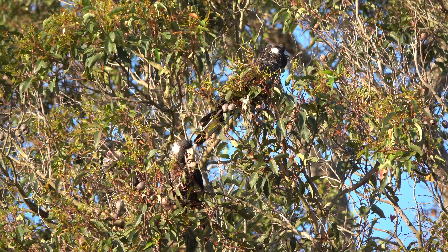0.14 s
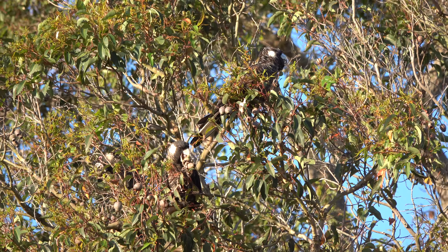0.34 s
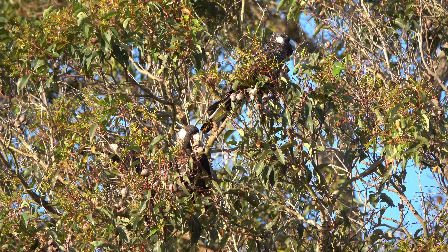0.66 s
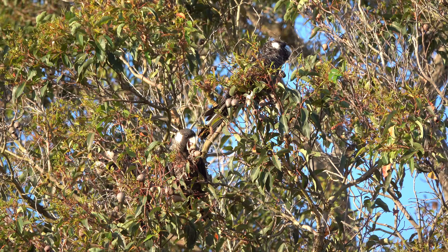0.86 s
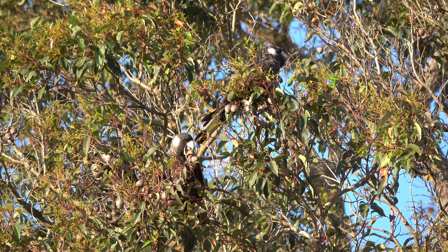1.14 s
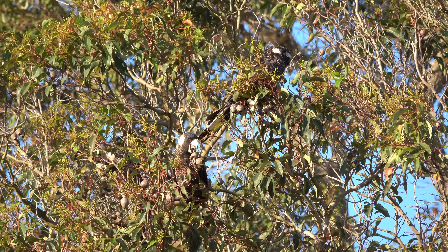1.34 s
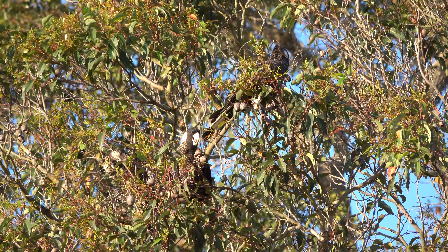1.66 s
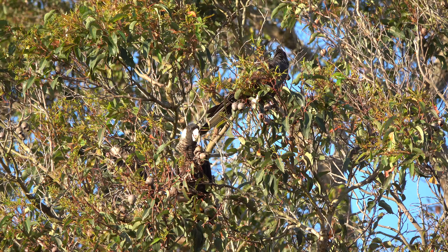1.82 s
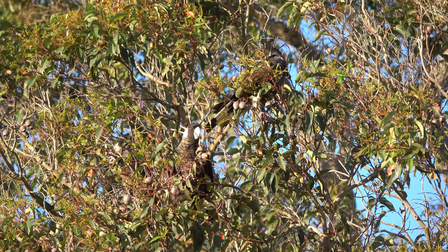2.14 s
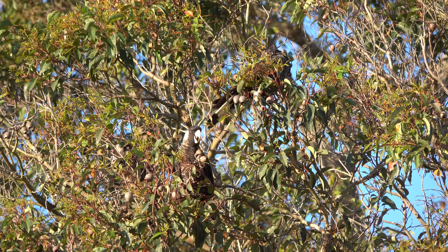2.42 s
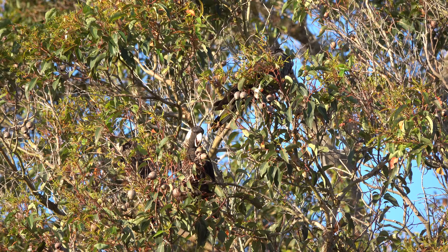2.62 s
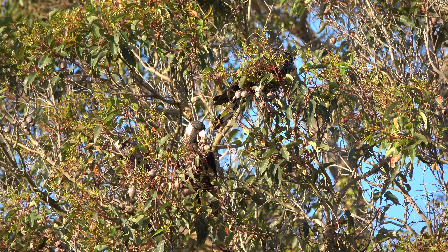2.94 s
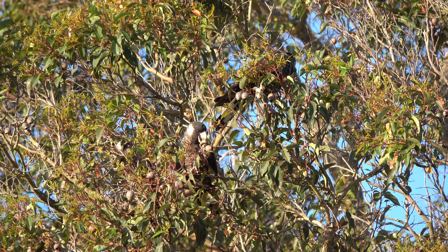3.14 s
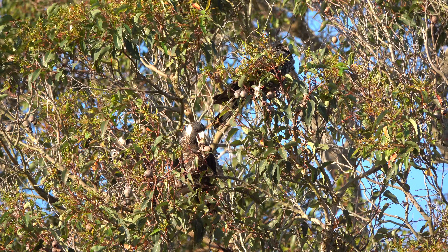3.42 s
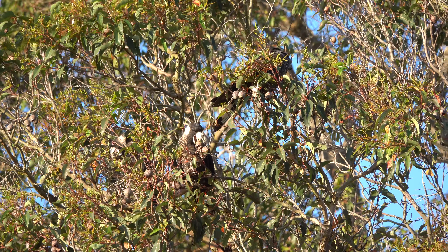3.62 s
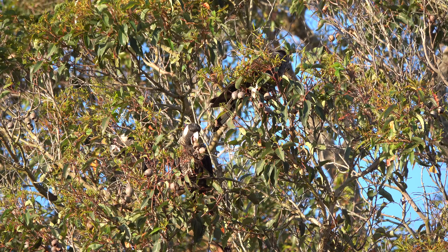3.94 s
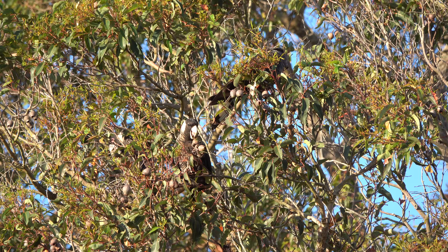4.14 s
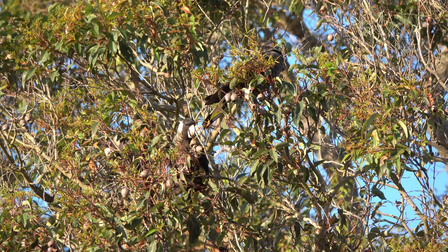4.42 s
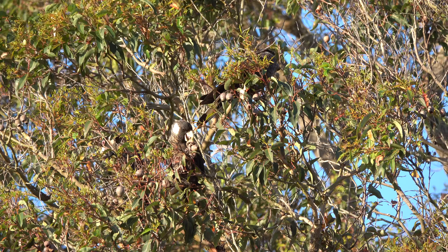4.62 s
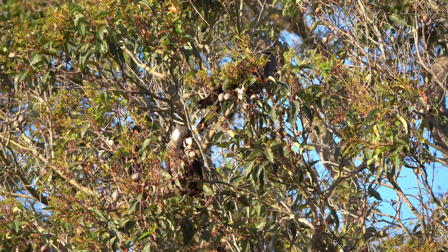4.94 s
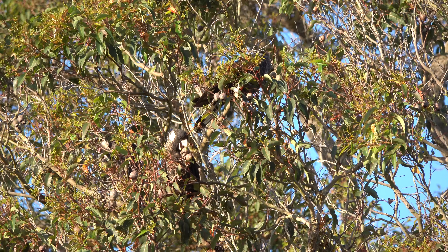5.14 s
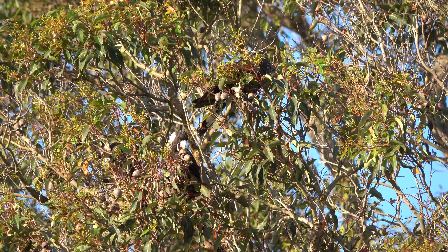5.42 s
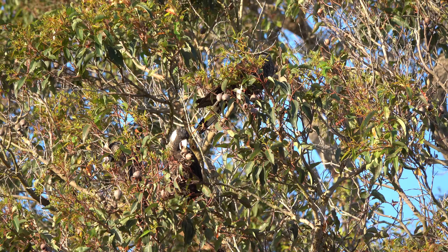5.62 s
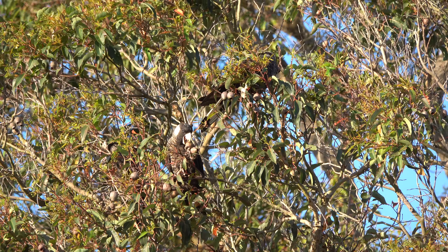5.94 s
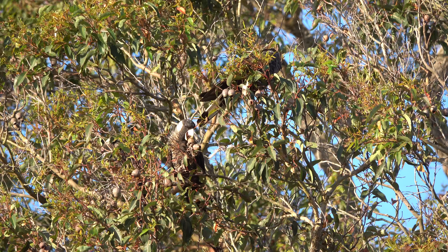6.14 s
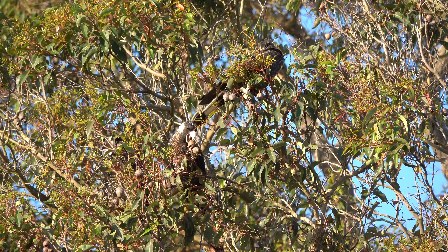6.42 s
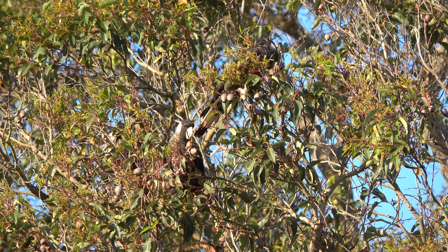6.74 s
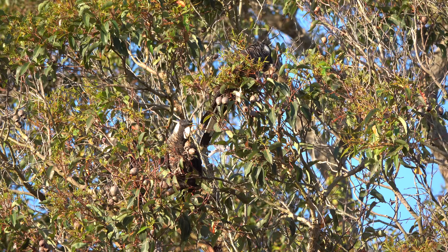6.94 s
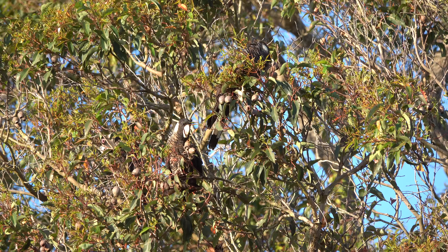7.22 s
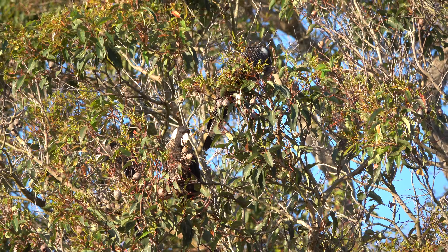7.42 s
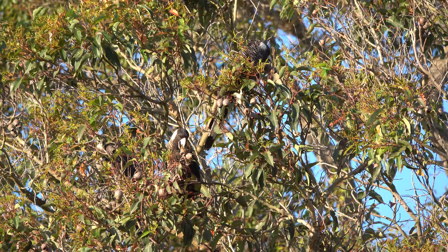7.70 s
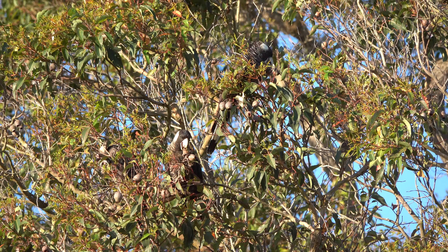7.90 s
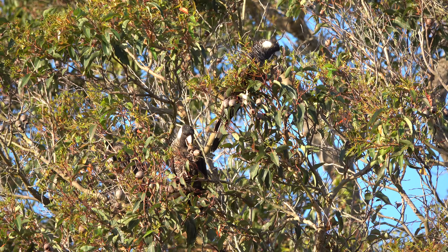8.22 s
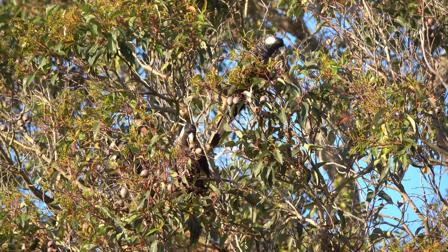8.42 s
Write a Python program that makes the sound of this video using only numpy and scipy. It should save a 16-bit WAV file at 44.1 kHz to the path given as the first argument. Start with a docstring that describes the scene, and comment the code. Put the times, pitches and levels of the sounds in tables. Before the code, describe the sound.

In short clusters with pauses between, cockatoos wail, squeak and squawk among branches, twigs snap faintly, and a low airy rush continues beneath.

```python
"""Black cockatoos call while they feed high in a gum tree: gliding whistles that break down to a lower register,
wavering squeaks, nasal squawks, hoarse cries, clear tones and one toneless screech.
Calls are unsteady harmonic tones shaped by throat resonances; branches scatter them and the forest rings on.
Twigs snap as shaped noise; a distant rush, a low drone, a faint hum and a hiss lie below."""
import sys
import numpy as np
from scipy import signal
from scipy.fft import rfft, irfft, next_fast_len
from scipy.io import wavfile

SR = 44100
rng = np.random.default_rng(int(sys.argv[2]) if len(sys.argv) > 2 else 0)


def file_out(sig):
    """Save sig as 16-bit WAV at sys.argv[1]."""
    # one column per channel
    cols = np.atleast_2d(sig).T
    # limit, then scale
    lim = np.clip(cols, -1, 1)
    pcm = np.round(lim * 32767).astype(np.int16)
    wavfile.write(sys.argv[1], SR, pcm)


N = 377937
CUTOFF_HZ = 15700
WAIL_SLOPE_DB = -6  # per octave of overtones

# resonance of throat and open beak: (frequency [Hz], gain [dB])
THROAT = [(750, -16), (1200, -8), (1700, 0), (2900, 4), (4300, 1.5), (5100, 0), (5900, 2.5), (6700, -10),
          (7400, -11.5), (8100, -12.5), (8900, -14), (10500, -9.5), (13500, -35.5), (15500, -22.5)]
# likeness of the two channels: (frequency [Hz], left-right correlation [-1 to 1])
LIKENESS = [(60, 0.97), (250, 1), (600, 0.67), (1100, 0.79), (3000, 0.35), (12000, 0.38)]


def cockatoos():
    """Wails are clean and direct; the cries of the flock are hoarser and more scattered."""
    # Short notes, all: (onset [s], length [s], start pitch [Hz], end pitch [Hz], arch: bulge halfway [share of pitch],
    # direct level at mid-note [dB], swell: rise over the note [dB], boost of overtones [dB])
    # clean yelps that lead into a wail, or end it a register lower; columns as above
    yelp_rows = [ (1.391, 0.073, 1938, 1683, .035, -37.5, -5.5, 2.5),
                 (2.646, .023, 4156, 4286, 0.0025, -33.5, -4, -5),
                 (2.782, .075, 3890, 3243, 0.0091, -32.5, 5.5, -10),
                 (2.99, .048, 2120, 1730, .025, -30, -6, -0.5),
                 (3.848, 0.041, 2190, 1640, 0.028, -29, -14, -1), ]
    # thin wavering squeaks of a bird to the right; columns as above
    squeak_rows = [ (.805, 0.048, 4440, 4210, 0.071, -47, 9, 6),
                   (.844, 0.035, 3790, 3960, -0.052, -41, -2, 4),
                   (.89, 0.029, 4540, 4400, 0.038, -40, 6, 8.5),
                   (.917, 0.017, 4760, 3800, 0.052, -35.5, -1, 3),
                   (.932, 0.013, 2950, 2910, 0.0024, -46.5, -1, -4),
                   (6.355, 0.064, 3930, 4100, .04, -47, 5, -1),
                   (6.42, 0.031, 4070, 4770, -.06, -39.5, 1, 2),
                   (6.446, .021, 4340, 5060, -0.038, -35.5, 6, -3),
                   (6.468, 0.036, 4190, 4610, -0.036, -39.5, 2, 10),
                   (6.496, .047, 4970, 4220, .1, -40.5, 14, -14),
                   (6.541, .018, 3090, 3100, 0.0042, -45.5, -7, 6),
                   (8.405, 0.048, 3030, 3260, -0.0063, -53.5, 16, -6),
                   (8.45, 0.055, 4200, 3870, 0.0046, -46.5, 7, -5),
                   (8.502, 0.068, 3050, 2980, -0.02, -46.5, -1, -4), ]
    # clear tones: separate calls and strong single overtones of other calls; columns as above
    clear_rows = [ (0, 0.13, 1507, 1433, .005, -53, 3, -10), (0, .11, 2245, 2200, 0.0023, -50.5, -11, 2.5),
                  (.128, 0.093, 3130, 2790, .1, -51.5, 7, -10), (.23, .11, 3210, 3190, 0.071, -46.5, -2, 4),
                  (.35, 0.067, 3280, 3395, 0.04, -49.5, -0.5, 2), (.17, 0.039, 4450, 4150, 0, -48, -5, -8),
                  (.303, .028, 5550, 4670, 0, -49, -1, -15), (.365, .04, 4700, 4350, 0, -48, 2, -6),
                  (.415, .08, 3710, 3490, .11, -47, 1, 3), (.446, 0.028, 3270, 2520, 0.018, -47.5, 2, 0),
                  (.498, 0.036, 2880, 2050, -0.028, -49.5, 4, 10),
                  (2.15, 0.94, 1828, 1725, -.025, -68.5, 5, -14),
                  (2.515, 0.061, 3050, 3630, 0.033, -59, -1.5, 4),
                  (2.55, .06, 4270, 3870, 0, -64.5, -7, -6), (2.585, 0.1, 3260, 3350, -.07, -54, 0, 2),
                  (2.68, .06, 2460, 2670, 0, -64, -2, -3), (2.695, 0.089, 3350, 3660, 0.032, -59, -8, 7),
                  (3.08, 0.036, 5210, 5010, .01, -48, -6.5, -11),
                  (3.109, .023, 4240, 4000, 0.011, -43.5, -7, 3.5),
                  (3.438, 0.057, 1524, 1945, 0.018, -38, 1, -5.5),
                  (3.45, .06, 3150, 3675, .05, -41.5, 1, -6),
                  (3.503, .022, 3195, 2870, -0.027, -40, -12, -16.5),
                  (3.53, 0.074, 2935, 2595, -0.016, -51, 6.5, -12.5),
                  (3.595, 0.11, 3950, 3325, 0.061, -47, 7, 1),
                  (3.63, 0.059, 2596, 2400, .035, -52, 9.5, 24.5),
                  (4.86, 0.069, 5130, 5320, .008, -75, -7, -11),
                  (6.166, 0.016, 4790, 4660, 0.00092, -39, -5, -8),
                  (6.2, 0.12, 2950, 3290, 0.035, -56, 1, -3),
                  (7.308, 0.078, 1164, 1453, 0.061, -57.5, -10, -9),
                  (7.385, 0.08, 2315, 2320, .01, -46, 3, -7), ]
    # hoarse, wavering cries of the flock; columns as above
    cry_rows = [ (.09, 0.13, 4400, 4900, 0.036, -50.5, 3, -7), (.165, 0.12, 4430, 3520, 0, -55, -8, 1),
                (.275, 0.059, 4260, 4090, 0.0076, -45, 4, 4), (.28, 0.12, 5620, 4300, -0.038, -47, 3, -12),
                (3.14, 0.057, 3500, 3093, -.02, -40, -2, 0), (3.2, 0.16, 3090, 2730, .01, -55, -8, 5),
                (3.423, 0.0245, 1627, 2000, 0.088, -42, -2, 1),
                (3.44, 0.069, 2800, 3700, 0.084, -45, -5, -3),
                (5.645, 0.097, 3780, 4200, 0.0064, -60, 8, -0.5),
                (5.71, .1, 4720, 4360, -.055, -52, -3, -2), (5.825, .11, 3125, 1850, .06, -58, -2, -2),
                (5.84, 0.13, 3920, 4610, 0.0069, -53, 9, 1.5),
                (5.9, 0.147, 3460, 3290, -0.046, -62.5, -8, -1),
                (6.07, 0.099, 3135, 1850, 0.016, -56.5, -1, -3),
                (6.08, 0.18, 4010, 4660, 0.05, -55, 0, 5.5),
                (7.285, 0.035, 1585, 2190, -0.0043, -60.5, 7, -9),
                (7.47, 0.088, 1710, 1605, 0.006, -50.5, 3, 0),
                (8.175, .06, 2740, 2467, 0.0012, -57.5, -1, 8.5), ]
    # nasal low-register calls; columns as above
    squawk_rows = [ (0, 0.11, 759.5, 731, .01, -51, -12, 10), (6.541, 0.024, 761, 777, 0, -53, -8, 0),
                   (7.072, 0.071, 792, 724, 0.027, -53.5, -1, 5),
                   (7.436, 0.11, 1809, 1202, 0, -46.5, -11.5, 1),
                   (7.498, 0.058, 876.4, 766, 0.0049, -46, -4, -2),
                   (7.635, .07, 829, 728, 0.0088, -58.5, -1, -14),
                   (8.183, 0.044, 670, 618, 0, -56.5, -3, 8), ]

    # jitter: spread of pitch [share]; rasp: depth of hoarseness [ratio]
    pure = dict(jitter=.002, rasp=.01)
    slightly_hoarse = dict(jitter=.005, rasp=.12)
    wavering = dict(jitter=.008, rasp=.12)
    creaky = dict(jitter=.008, rasp=.2)
    hoarse = dict(jitter=.022, rasp=.42)

    yelps = glides(yelp_rows, attack_s=.0078, release_s=.0088)
    wails = syrinx([*wail_notes(), *yelps], flutter_db=2, slope_db=WAIL_SLOPE_DB, **pure)
    squeaks = syrinx(glides(squeak_rows, attack_s=.0071, release_s=.0022),
                     flutter_db=2, slope_db=-9, **wavering)
    clear_tones = syrinx(glides(clear_rows, attack_s=.0033, release_s=.007),
                         flutter_db=2.5, slope_db=-7.5, **slightly_hoarse)
    cries = syrinx(glides(cry_rows, attack_s=.0061, release_s=.01),
                   flutter_db=4, slope_db=-10.5, **hoarse)
    squawks = syrinx(glides(squawk_rows, attack_s=.0019, release_s=.006),
                     flutter_db=.5, slope_db=-8.5, **creaky)
    return (panned(forest(wails, scatter_db=-2.5, scatter_t60_s=.28, tail_db=-18), pan_db=-1.5)
            + panned(forest(squeaks, scatter_db=-5.5, scatter_t60_s=.28, tail_db=-15.5), pan_db=-6.5)
            + panned(forest(clear_tones, scatter_db=-.5, scatter_t60_s=.26, tail_db=-11.5), pan_db=-3)
            + panned(forest(cries, scatter_db=0, scatter_t60_s=.39, tail_db=-11.5), pan_db=-2.5)
            + panned(forest(squawks, scatter_db=-2.5, scatter_t60_s=.21, tail_db=-10.5), pan_db=-.5))


def wail_notes():
    """A wail glides along a pitch curve; fundamental and octave fluctuate as scattered sound interferes."""
    # long wails of the nearest birds, one curve each:
    # (time [s], pitch [Hz], fundamental level [dB], octave level [dB])
    wail_curves = [
        [(1.085, 2580, -55, -61.5), (1.119, 2665, -43, -42.5), (1.201, 2773, -30, -43), (1.255, 2767, -32, -52),
         (1.277, 2729, -44.5, -37.5), (1.321, 2662, -33.5, -40.5), (1.383, 2504, -32.5, -50.5),
         (1.392, 2420, -38, -59)],
        [(2.855, 2960, -36.5, -51), (2.885, 2818, -28, -46.5), (2.955, 2638, -30.5, -33.5),
         (2.981, 2487, -26, -45), (2.992, 2360, -43, -56)],
        [(3.686, 3142, -35, -35), (3.706, 2942, -26, -33.5), (3.74, 2912, -24.5, -30),
         (3.774, 2810, -27, -46.5), (3.794, 2738, -22.5, -33), (3.804, 2677, -33.5, -41),
         (3.844, 2454, -24, -43), (3.851, 2400, -53, -59)],
    ]
    for wail in wail_curves:
        t = note_times(wail[0][0], wail[-1][0])
        pitch, first_db, octave_db = in_time(wail, t)
        level = np.hypot(from_db(first_db), from_db(octave_db))
        # take out what the syrinx adds to the octave by itself
        throat_tilt_db = WAIL_SLOPE_DB + at_hz(THROAT, 2 * pitch) - at_hz(THROAT, pitch)
        yield t, pitch, level, octave_db - first_db - throat_tilt_db


def glides(rows, attack_s, release_s):
    """Each note slides along one arch of pitch; its level rises, swells or sags evenly, and is released."""
    for start, length, start_hz, end_hz, arch, level_db, swell_db, overtones_db in rows:
        t = note_times(start, start + length)
        along = (t - start) / length
        bulge = 1 + arch * (1 - (2 * along - 1) ** 2)
        pitch = (start_hz + (end_hz - start_hz) * along) * bulge
        gate = np.clip((t - start) / attack_s, 0, 1) * np.clip((t[-1] - t) / release_s, 0, 1)
        yield t, pitch, gate * from_db(level_db + swell_db * (along - .5)), overtones_db


def note_times(start, end):
    """Times of the samples of one note."""
    return np.arange(max(int(start * SR), 0), min(int(end * SR), N)) / SR


def syrinx(notes, jitter, flutter_db, slope_db, rasp):
    """A membrane follows each pitch glide unsteadily; its harmonics sweep through the throat's resonances."""
    out = np.zeros(N)
    k = np.arange(1, 13)[:, None]  # harmonic numbers
    for t, pitch, level, overtones_db in notes:
        pitch = pitch * (1 + jitter * drift(156, len(t)))
        phase = 2 * np.pi * np.cumsum(pitch) / SR
        gains_db = slope_db * np.log2(k) + (k > 1) * overtones_db + at_hz(THROAT, k * pitch)
        gains = from_db(gains_db) * (k * pitch < CUTOFF_HZ)
        power = np.sum(gains ** 2, axis=0) / 2
        tone = np.sum(gains * np.sin(k * phase), axis=0) / np.sqrt(power)
        # chaotic beating of the membrane smears every harmonic into a hoarse band
        tone = tone * (1 + rasp * hoarseness(len(t), width_hz=550)) / np.sqrt(1 + rasp ** 2)
        to_edge_s = np.minimum(t - t[0], t[-1] - t)
        edges = np.sin(np.pi / 2 * np.clip(to_edge_s / .004, 0, 1)) ** 2
        flutter = from_db(flutter_db * drift(70.7, len(t)))
        out[np.rint(t * SR).astype(int)] += tone * edges * level * flutter
    return out


def hoarseness(size, width_hz):
    """Low-pass noise of unit power that roughens a tone."""
    low_pass = signal.butter(4, width_hz, fs=SR, output="sos")
    settled = signal.sosfilt(low_pass, rng.standard_normal(size + 1000))[1000:]
    return rms_one(settled)


def screech(t):
    """Air forced through the syrinx without a tone, in a ragged rattle."""
    # (frequency [Hz], relative level per Hz [dB])
    screech_colour = [(1180, -45.5), (2000, -20), (2270, -16), (2970, -6.5), (4340, 0), (5360, -7.5),
                      (6290, -12), (9920, -20.5), (15000, -48.5)]
    onset_s, attack_s, hold_s = 3.11, .038, .097
    level_db, fade_db_per_s = -41.5, 176.5
    attack = np.clip((t - onset_s) / attack_s, 0, 1)
    fade_db = fade_db_per_s * np.clip(t - onset_s - attack_s - hold_s, 0, 1)
    return attack * from_db(level_db - fade_db + 3 * drift(120, N)) * coloured_noise(screech_colour)


def twigs(t):
    """Each snap dies away in a grainy rustle of leaves."""
    # twigs snapping: (onset [s], level [dB], time to fall by 23 dB [s])
    snaps = [(1.897, -64, 0.044), (2.316, -71, .04), (4.701, -72, 0.2), (4.81, -78, 0.15),
             (5.057, -57.5, 0.016), (6.26, -46.5, 0.045), (6.29, -56, 0.8), (7.898, -60, 0.036)]
    # (frequency [Hz], relative level per Hz [dB])
    snap_colour = [(300, -60), (1500, -1.5), (3000, 4), (5500, 0.5), (9000, -9.5), (15000, -21.5)]
    envelope = 0
    for onset_s, level_db, fall_s in snaps:
        fade_db = 23 * np.clip((t - onset_s) / fall_s, 0, 4)
        envelope = envelope + (t >= onset_s) * from_db(level_db - fade_db)
    return envelope * from_db(4 * drift(260, N)) * coloured_noise(snap_colour)


def forest(x, scatter_db, scatter_t60_s, tail_db):
    """Direct sound, quick scatter from the branches around the bird, and a long tail from the trees beyond."""
    # ringing of the trees beyond: (frequency [Hz], time to fall by 60 dB [s])
    tail_t60 = [(500, 1.5), (2000, 0.9), (3000, 1.59), (5500, 0.76), (8000, 1.28), (15000, 0.18)]
    t = np.arange(3 * SR // 2) / SR
    scatter, tail = 0, 0
    for hz, band in noise_bands(len(t), 350):
        scatter = scatter + band * from_db(-60 * t / scatter_t60_s)
        tail = tail + band * from_db(-60 * t / at_hz(tail_t60, hz))
    # both build up gradually
    scatter = scatter * (1 - np.exp(-t / .003))
    tail = tail * (1 - np.exp(-t / .12))
    echoes = from_db(scatter_db) * rms_one(scatter) + from_db(tail_db) * rms_one(tail)
    echoes = echoes / np.sqrt(len(t))
    return x + signal.fftconvolve(np.atleast_2d(x), echoes, axes=1)[:, :N]


def background(t):
    """A far rush of slowly changing level, a low drone setting in, a wavering hum and steady hiss."""
    # distant rush before its gain: (time [s], level [dB])
    rush_levels = [(0.0, -50), (0.31, -49), (0.86, -54), (1.17, -50), (1.89, -54), (2.31, -51.5),
                   (3.22, -55), (4.34, -53.5), (4.8, -55.5), (5.13, -54), (5.56, -55.5), (7.59, -54.5),
                   (7.83, -57), (8.57, -56.5)]
    # (frequency [Hz], relative level per Hz [dB])
    rush_colour = [(18, -58), (30, -47), (54, -37.5), (76, -27.5), (102, -31.5), (209, -20.5), (257, -11.5),
                   (352, -10), (528, -5.5), (697, -1.5), (920, 2.5), (1170, -0.5), (1790, -6.5),
                   (2200, -16), (2500, -20), (3250, -55), (5500, -120)]
    # low drone: (time [s], pitch [Hz], level [dB])
    drone_curve = [(0, 55, -115), (4.3, 55.5, -105), (4.7, 59.4, -82), (5.0, 62, -75.5), (5.6, 64.9, -89),
                   (7.6, 68.6, -86), (8.2, 70.3, -82), (8.57, 67.5, -86)]
    # faint far-off hum: (mean pitch [Hz], level [dB])
    hum_tones = [(361, -78), (581, -69)]
    # (frequency [Hz], relative level per Hz [dB])
    hiss_colour = [(1350, -40.5), (2300, 2), (3400, -1.5), (4460, -2.5), (7150, -8.5), (8860, -10),
                   (15500, -15)]
    rush_gain_db, hiss_db = 1.5, -67.5

    rush_db, = in_time(rush_levels, t)
    rush = from_db(rush_db + rush_gain_db + .5 * drift(17, N)) * coloured_noise(rush_colour)
    drone_hz, drone_db = in_time(drone_curve, t)
    drone = from_db(drone_db) * sine(drone_hz)
    hum = 0
    for hz, level_db in hum_tones:
        hum = hum + from_db(level_db) * sine(hz * (1 + .01194 * drift(11.48, N)))
    hiss = from_db(hiss_db) * coloured_noise(hiss_colour)
    return panned(rush + hum, pan_db=-2.5) + drone + panned(hiss, pan_db=-1.5)


def sine(pitch_hz):
    """Sine of unit power that follows a pitch curve."""
    return np.sqrt(2) * np.sin(2 * np.pi * np.cumsum(pitch_hz) / SR)


def noise_bands(size, low_hz):
    """Half-octave bands of stereo noise, correlated as LIKENESS says: (centre [Hz], band)."""
    white = rng.standard_normal((2, 2, size))
    count = round(2 * np.log2(CUTOFF_HZ / low_hz))
    edges = np.geomspace(low_hz, CUTOFF_HZ, count + 1)
    for k, (low, high) in enumerate(zip(edges, edges[1:])):
        band_pass = signal.butter(3, [low, high], "band", fs=SR, output="sos")
        # neighbouring bands use independent noise
        mid, side = signal.sosfilt(band_pass, white[k % 2])
        hz = np.sqrt(low * high)
        yield hz, stereo(mid, side, hz)


def coloured_noise(colour):
    """Steady stereo noise with the given spectrum; rms 1."""
    size = next_fast_len(N)
    hz = np.maximum(np.fft.rfftfreq(size, 1 / SR), 1)
    mid, side = rfft(rng.standard_normal((2, size))) * from_db(at_hz(colour, hz))
    return rms_one(irfft(stereo(mid, side, hz), size)[:, :N])


def stereo(mid, side, hz):
    """Mix independent mid and side noise to the left-right correlation at hz."""
    alike = at_hz(LIKENESS, hz)
    return np.sqrt(1 + alike) * mid + np.sqrt(1 - alike) * side * [[1], [-1]]


def panned(x, pan_db):
    """Stereo placement by level difference, left minus right."""
    return x * from_db(np.array([[pan_db], [-pan_db]]) / 2)


def drift(rate_hz, size):
    """Smooth random wander of spread 1: twice low-passed noise, drawn at SR / 8."""
    r = np.exp(-16 * np.pi * rate_hz / SR)
    slow = signal.lfilter([1], [1, -2 * r, r * r], rng.standard_normal(size // 8 + 6002))
    # skip the first 6000 values while the filter settles
    return np.interp(np.arange(size) / 8 + 6000, np.arange(len(slow)), rms_one(slow))


def in_time(rows, t):
    """Columns of a curve at the times t."""
    s, *columns = np.transpose(rows)
    return [np.interp(t, s, c) for c in columns]


def at_hz(points, hz):
    """Read a spectrum on a log-frequency axis."""
    f, value = np.transpose(points)
    return np.interp(np.log(hz), np.log(f), value)


def from_db(db):
    """Decibels to gain."""
    return 10 ** (np.asarray(db) / 20)


def rms_one(x):
    """Scale to unit power."""
    return x / np.sqrt(np.mean(x ** 2) + 1e-20)


def scene():
    """Birds and twigs in the canopy over the background."""
    t = np.arange(N) / SR
    noises = forest(screech(t) + twigs(t), scatter_db=-16, scatter_t60_s=.092, tail_db=-8.5)
    return cockatoos() + panned(noises, pan_db=-1.5) + background(t)


def record(dry):
    """The top is cut steeply."""
    return signal.sosfilt(signal.ellip(10, .2, 80, CUTOFF_HZ, fs=SR, output="sos"), dry)


dry = scene()
out = record(dry)
file_out(out)
```